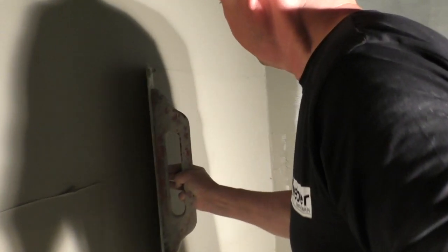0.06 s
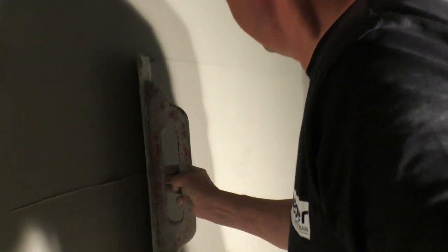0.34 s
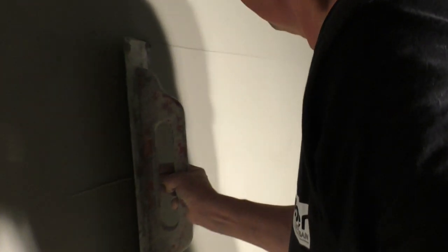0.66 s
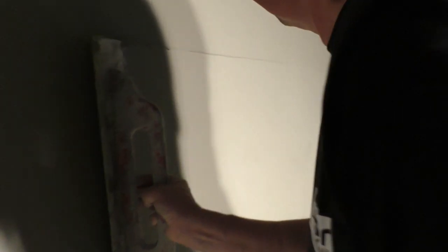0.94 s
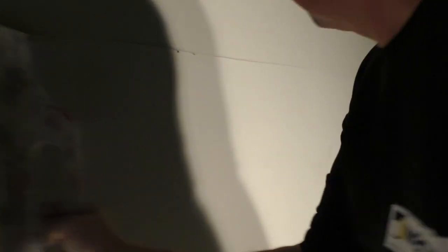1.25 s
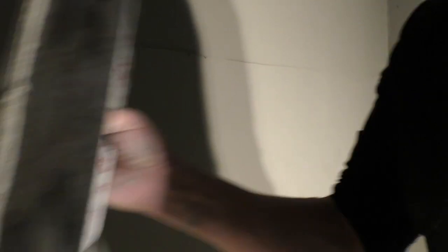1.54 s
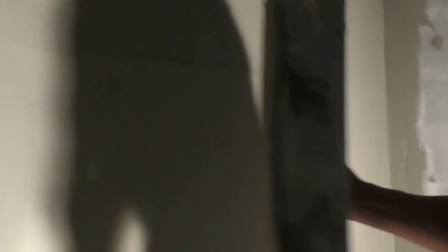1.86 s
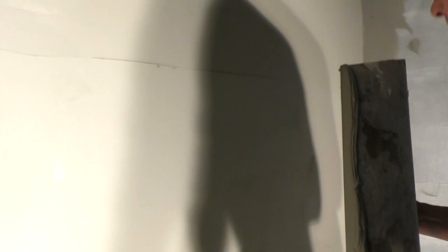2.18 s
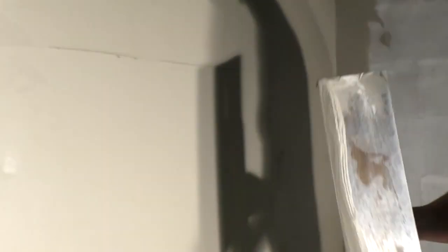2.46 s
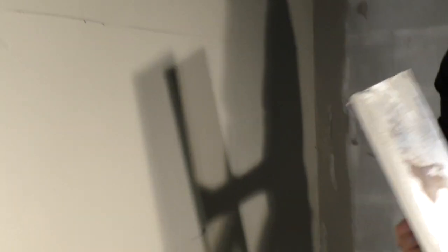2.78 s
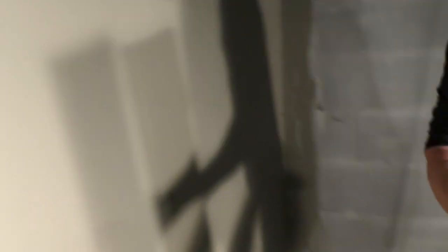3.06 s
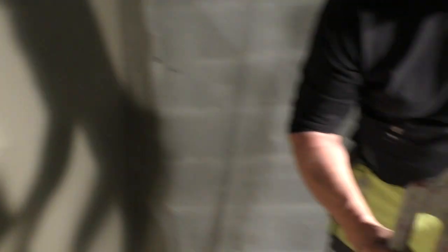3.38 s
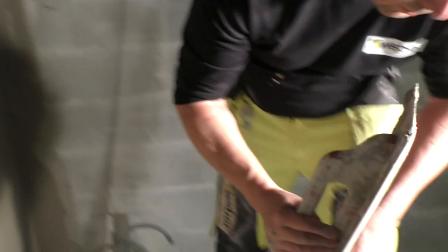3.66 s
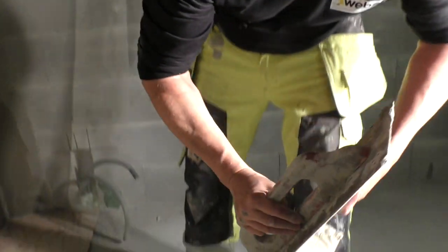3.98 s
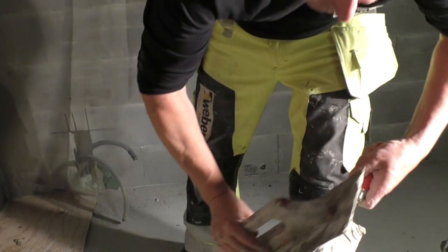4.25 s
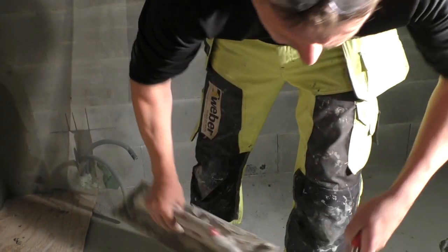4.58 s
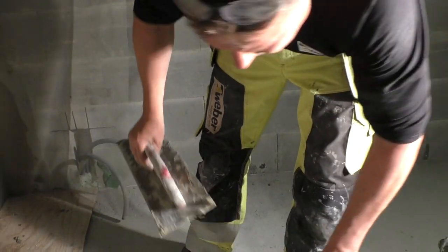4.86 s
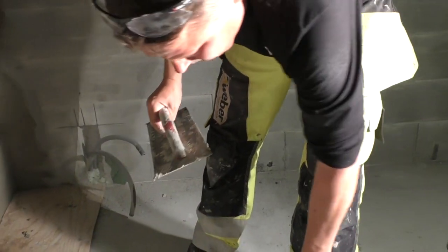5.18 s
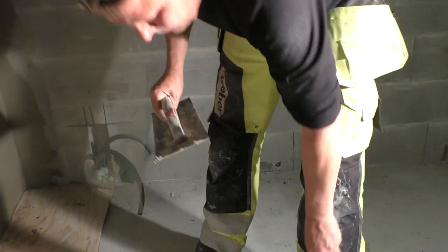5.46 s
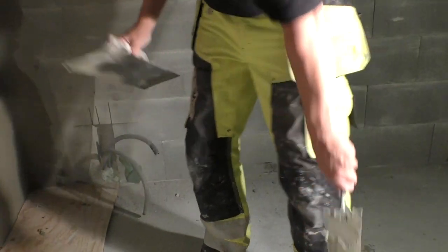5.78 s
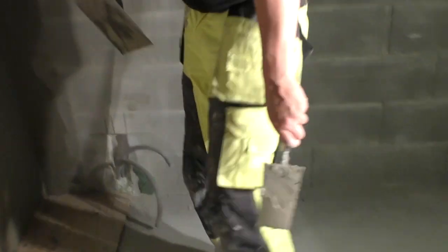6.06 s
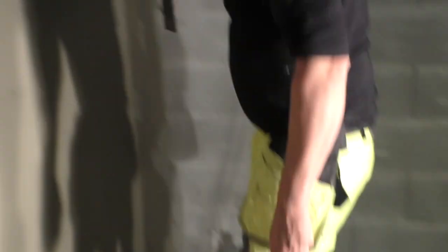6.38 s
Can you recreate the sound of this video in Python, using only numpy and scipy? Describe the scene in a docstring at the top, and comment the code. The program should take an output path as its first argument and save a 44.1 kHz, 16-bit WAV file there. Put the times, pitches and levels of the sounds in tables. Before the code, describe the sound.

In a bare, slightly echoing room, wet mortar rasps under a steel trowel, fading before a quick finishing swipe. Soft steps and rustling clothes follow. Then two trowels click and scrape together, steel on steel, and the loosened mortar lands in a tub with a wet, hollow thump. A gritty footstep comes last. A hand-held microphone picks up low rumble and a faint steady hum underneath.

```python
"""A wet, gritty rasp with a brief sinking tone: a plasterer draws a steel trowel through mortar on a wall.
He flicks it off, steps back over a gritty floor, scrapes the blade clean with a second trowel, drops
the lump into a booming tub and scuffs away. The scrapes are stick-slip friction of sand grains, coloured
by the resonances of the steel; the boom is the free vibration of the tub. A bare block-walled room
reflects it all, over a faint hum and the low rumble of a swaying hand-held microphone."""
import sys
import numpy as np
from scipy import signal
from scipy.fft import rfft, irfft, next_fast_len
from scipy.io import wavfile
from scipy.ndimage import map_coordinates

SR = 44100
rng = np.random.default_rng(int(sys.argv[2]) if len(sys.argv) > 2 else 0)


def dump(signal):
    """Clip the signal to [-1, 1] and save it as 16-bit WAV at the path in sys.argv[1]."""
    limited = np.clip(np.atleast_2d(signal).T, -1, 1)
    pcm = np.round(limited * 32767).astype(np.int16)
    wavfile.write(sys.argv[1], SR, pcm)


N = 291954
TIME = np.arange(N) / SR

# A scrape has four bands, low to high: drag, paste, rasp, hiss. A mix is (drag, paste, hiss) re rasp.
# pressure of the blade on the wall, expressed as its rasp: (time [s], level [dB])
WALL_PRESSURE = [(0, -44), (.05, -52), (.104, -53), (.113, -38.5), (.155, -35), (.25, -40), (.6, -47.5),
                 (.88, -55.5), (1.1, -54), (1.26, -39.5)]
FIRM_DB = -40   # an ordinary firm pressure
# mix on the wall, a row per band: (level at firm pressure [dB], slope with pressure [dB/dB])
PRESSURE_MIX = [(-3.5, 1.0), (-2.5, .1), (-11.5, -.38)]
# wet paste shearing under the blade: (pressure [dB], centre frequency [Hz], level [dB])
PASTE_SHEAR = [(-56, 950, -51), (-51, 1000, -42), (-45, 990, -37.5), (-39, 840, -33.5)]
# the blade sings, sinking as it flattens: (time [s], frequency [Hz], level [dB])
BLADE_SONG = [(0.15, 900, -46), (0.2, 839, -33.5), (0.27, 787, -36.5), (0.33, 730, -50), (0.46, 690, -50),
              (0.52, 670, -60)]
# resonances of the steel blade: (frequency [Hz], bandwidth [Hz], relative gain [dB])
BLADE_MODES = [(1120, 39, -2), (1500, 90, 3), (1730, 70, -16), (2015, 105, 4), (2612, 42, 9),
               (3270, 180, 8), (3430, 160, 10), (4320, 160, 5)]

# quick strokes: (start [s], attack [s], hold [s], release [s], rasp [dB], sag over the hold [dB],
# drag re rasp [dB], drag gained as mortar gathers [dB], paste re rasp [dB], hiss re rasp [dB])
FLICK_STROKE = (1.243, .028, .09, .014, -23, 5.5, -10.5, 11, 1, -10.5)
SCOOP_STROKE = (3.414, .016, .072, .036, -21.2, 0, -7, 0, -4.5, -15.5)
TUB_STROKE = (5.372, .012, .335, .025, -35.5, 4.5, 3, 0, 4.5, -17.5)
SCUFF_STROKE = (6.326, .02, .036, .025, -26, 0, -5.5, 0, -3, -13)
# the hand pushes and tilts the blade in cleaning: (time [s], half length [s], rasp [dB], hiss [dB])
HAND_PUSHES = [(3.845, .03, 3, -1), (3.89, .025, -1, -10), (3.94, .018, 3, 2), (4.115, .05, -4, -7),
               (4.29, .03, 7.5, 3.5), (4.475, .025, 4, -2)]
# modes of the tub: (frequency [Hz], relative level [dB], T60 [s])
TUB_WALL_MODES = [(267, 3.5, .17), (314, -7, 0.1), (422, -8, 0.093), (583, -21, .16), (670, -15, .18),
                  (1070, -20, .1), (1427, -9, 0.19), (1535, -3.5, 0.14), (1610, -20, 0.095)]
LANDING_S = 5.368   # the lump meets the tub

# soles shifting on the floor: (start [s], hold [s], rasp level [dB], dry grit [0-1])
SOLE_SLIDES = [(0, .04, -46, 0), (2.085, .06, -48, .1), (2.307, .07, -42.5, .45), (2.735, .045, -44, .9),
               (2.815, .15, -44, .5), (3.005, .09, -47, .05), (3.352, .02, -48, .2), (4.815, .14, -53, .35),
               (5.11, .015, -55, .6), (5.97, .012, -37.5, .97), (6.302, .03, -37.5, .15),
               (6.44, .17, -51.5, 0)]
# mix of a step, a row per band: (level for a soft sole [dB], level on dry grit [dB])
SOLE_MIX = [(2, -22), (2, -15), (-12.5, -17)]
# clothes rustling: (start [s], hold [s], rasp level [dB])
CLOTH_RUSTLES = [(2.1, .95, -57), (4.72, .38, -62), (5.8, .78, -59)]
# sand cracking and steel touching: (time [s], snap peak [dB], treble lift [dB])
GRAIN_TICKS = [(0.108, -28, 0), (0.5565, -24, -6), (0.688, -30, -2), (1.270, -17, 0), (2.090, -32, -3),
               (2.313, -34, -7), (2.91, -26.5, -9), (3.011, -28, -4), (3.091, -30, -5), (3.4203, -18, -3),
               (3.4388, -8, -12), (3.4705, -13, -6), (3.4893, -7, -9), (4.014, -17, 0), (4.436, -11, 0),
               (4.521, -15, -4), (4.828, -36, 8), (4.892, -25, 5), (5.632, -25.5, -11), (6.172, -34, -13),
               (6.3415, -12.5, -6), (6.384, -13.5, -7), (6.506, -27.5, -10)]
# dull knocks of tools and shoes: (time [s], level [dB], centre frequency [Hz], T60 [s])
DULL_KNOCKS = [(0.556, -25, 560, .025), (0.688, -33, 1000, .03), (0.764, -29, 950, 0.026),
               (1.133, -32, 1047, 0.033), (1.272, -25, 820, .1), (2.09, -31, 192, 0.14),
               (3.011, -26.5, 600, 0.077), (3.091, -30.5, 796, 0.03), (3.468, -18.5, 275, 0.099),
               (4.515, -32, 364, 0.17), (5.718, -25.5, 620, 0.08), (6.341, -24.5, 420, 0.13)]

# spectra of the scrapes, before their four bands are balanced: (frequency [Hz], relative level [dB])
WALL_SPECTRUM = [(71, -65), (120, -23), (177, -8), (250, -18.5), (307, -8.5), (471, -10.5), (511, -4),
                 (615, -11), (802, 1.5), (1540, -21), (3490, -20), (5580, -23.5), (7890, -30.5),
                 (11600, -28.5), (15800, -33)]
FLICK_SPECTRUM = [(88, -50), (150, -30), (291, -20), (340, -7), (598, -15), (741, -0.5), (974, -8),
                  (1030, -5.5), (1470, -14.5), (2000, -10), (2900, -14), (3460, -11), (7110, -22.5),
                  (12000, -17.5), (15800, -27)]
SCOOP_SPECTRUM = [(71, -28), (120, -1), (181, -26), (255, -6), (400, -14), (533, -6.5), (1090, -5.5),
                  (1360, -2), (1710, -9), (2090, -2.5), (2370, -12), (3420, -9), (4550, -9), (6180, -21),
                  (15800, -43)]
CLEANING_SPECTRUM = [(120, -76), (200, -22.5), (416, -10), (472, -15), (547, -7), (746, -5), (803, -1),
                     (1340, -1), (2040, -2), (2230, -2), (3340, 3), (4310, 1.5), (7890, -20), (15000, -18),
                     (15800, -24)]
TUB_WIPE_SPECTRUM = [(71, -39), (120, -11), (226, -15), (272, -3.5), (326, -15), (392, -13), (522, -15),
                     (739, -9.5), (852, -5), (983, -11.5), (1110, -6.5), (1930, -19), (3420, -18.5),
                     (6050, -33.5), (15800, -43)]
SCUFF_SPECTRUM = [(71, -45), (120, 2.5), (295, -5), (354, 2.5), (400, -3), (640, -5.5), (785, -13.5),
                  (1280, -10), (1420, -11), (1810, -14.5), (3420, -12), (12600, -27), (15800, -40)]
SHUFFLE_SPECTRUM = [(71, -20), (120, 4), (153, -11.5), (221, -6), (409, -11), (501, -12), (615, -12.5),
                    (739, -9.5), (1130, -15), (2730, -11.5), (3350, -5), (4360, -9.5), (15800, -36)]
# spectra of the wet slap, a tick, still air and rumble: (frequency [Hz], relative level [dB])
SLAP_SPECTRUM = [(60, -35), (120, -15), (190, -16), (290, -6), (400, 7), (600, -5), (1000, -6), (1250, -3),
                 (1550, 3.5), (1900, -17), (3600, -16), (7000, -32.5), (15800, -64)]
TICK_SPECTRUM = [(300, -23.5), (1000, -3), (2200, 2), (4000, 4), (7000, -17.5), (12000, -10.5),
                 (15800, -22)]
AIR_SPECTRUM = [(35, -13), (55, -14), (85, -15), (125, -21), (170, -20.5), (280, -18.5), (450, -18.5),
                (750, -18.5), (1240, -20.5), (2400, -29.5), (3500, -25.5), (5000, -33.5), (7500, -46),
                (15800, -49.5)]
RUMBLE_SPECTRUM = [(10, -11.5), (25, -3), (55, 0.5), (80, -17.5), (120, -20), (250, -39), (700, -86.5)]

# reverberation time of the room: (frequency [Hz], T60 [s])
REVERB_TIMES = [(150, .6), (500, 0.42), (1400, 0.5), (3700, 0.32), (10000, 0.27), (16000, 0.27)]
# swells added to the resting hum: (start [s], hold [s], level [dB])
HUM_SWELLS = [(1.38, .65, -57), (2.75, .45, -56)]
# slow pressure swings on the microphone: (time [s], relative level [dB])
SWAY_ENVELOPE = [(0.0, -38), (0.26, -19), (0.41, -30), (1.9, -36), (1.99, -29), (3.95, -18), (4.02, -24),
                 (4.77, -27), (5.03, -16), (5.12, -29), (5.9, -33), (6.01, -22), (6.25, -30), (6.4, -11),
                 (6.53, -14), (6.62, -30)]
# low thuds of footfalls and handling: (time [s], level [dB])
LOW_THUDS = [(0, -29), (.2, -41), (2.09, -40), (3.03, -40), (3.13, -39), (3.47, -39), (5.48, -39),
             (5.72, -35), (6.35, -36)]


def scrape(motion, spectrum, grains_per_s, grain_db, judder_db, steel, paste_from_hz=600):
    """Stick-slip friction: grains catch and slip as random impulses, which excite any steel's modes."""
    t, gate, (rasp_db, drag_db, paste_db, hiss_db) = motion
    sizes = from_db(grain_db * np.minimum(rng.exponential(1, len(t)), 4))
    signs = rng.choice([-1, 1], len(t))
    slips = rng.random(len(t)) < grains_per_s / SR
    clumping = from_db(judder_db * drift(t, 240))
    friction = coloured(sizes * signs * slips * clumping, spectrum)
    ringing = sum(from_db(db) * resonance(friction, hz, width) for hz, width, db in BLADE_MODES)
    contact = friction + steel * ringing
    bands = [(140, 600, drag_db), (paste_from_hz, 2200, paste_db),
             (2200, 6000, 0), (6000, 17000, hiss_db)]
    sound = sum(from_db(db) * unit_rms(band(contact, low, high)) for low, high, db in bands)
    return placed(gate * from_db(rasp_db) * sound, t[0])


def shear(motion, width_hz, judder_db):
    """Stick-slip of paste on the blade: random modulation spreads a moving tone into a noise band."""
    t, gate, (centre_hz, level_db) = motion
    phase = 2 * np.pi * np.cumsum(centre_hz) / SR
    noise_band = drift(t, width_hz) * np.cos(phase) + drift(t, width_hz) * np.sin(phase)
    judder = from_db(judder_db * drift(t, 90.2))
    return placed(gate * from_db(level_db) * unit_rms(noise_band * judder), t[0])


def wall_draw():
    """Friction follows normal force: more pressure drags more mortar, less leaves the edge hissing."""
    t, gate, (pressure_db,) = follow(WALL_PRESSURE)
    mix_db = [db + slope * (pressure_db - FIRM_DB) for db, slope in PRESSURE_MIX]
    return t, gate, [pressure_db, *mix_db]


def paste_smear():
    """Shear under load: the pressure of the blade sets the centre frequency and level of the paste."""
    t, gate, (pressure_db,) = follow(WALL_PRESSURE)
    pressures, *columns = np.transpose(PASTE_SHEAR)
    return t, gate, [np.interp(pressure_db, pressures, column) for column in columns]


def quick_stroke(row):
    """Transient friction: a stroke bites, then may lose force or gather drag as it slides."""
    start_s, attack_s, hold_s, release_s, rasp_db, sag_db, drag_db, gather_db, paste_db, hiss_db = row
    t, gate = swell(start_s, attack_s, hold_s, release_s)
    progress = np.clip((t - start_s - attack_s) / hold_s, 0, 1)
    return t, gate, [rasp_db - sag_db * progress, drag_db + gather_db * progress, paste_db, hiss_db]


def cleaning_pass(rasp_db=-25, bare_s=3.88, pile_s=4.42, pile_over_s=.09):
    """Mortar damps steel-on-steel friction: dull while loaded, bright when bare, dull as it piles up."""
    t, gate = swell(start_s=3.642, attack_s=.195, hold_s=.69, release_s=.028)
    push_db, tilt_db = sum(np.outer(gains_db, np.exp(-((t - s) / half_s) ** 2))
                           for s, half_s, *gains_db in HAND_PUSHES)
    load = np.clip((bare_s - t) / (bare_s - t[0]), 0, 1)
    pile = np.clip((t - pile_s) / pile_over_s, 0, 1)
    bare_mix_db = np.array([-21.5, -7.5, -3.5])[:, None]
    push_mix_db = np.array([.3 * push_db, 1.05 * push_db, tilt_db]) - push_db   # drag follows weakly
    mortar_mix_db = np.outer((11, 6, -10), load) + np.outer((10, 4.5, -4.5), pile)
    return t, gate, [rasp_db + push_db, *(bare_mix_db + push_mix_db + mortar_mix_db)]


def tub_boom(modes_db=-16.5, smack_db=-7):
    """Free vibration: the lump smacks the bottom, and the modes of the tub decay exponentially."""
    t = TIME[:SR]
    modes = sum(from_db(db - 60 * t / t60) * np.sin(2 * np.pi * hz * t)
                for hz, db, t60 in TUB_WALL_MODES)
    smack = snap(SLAP_SPECTRUM, len(t))
    return -placed(from_db(modes_db) * modes + from_db(smack_db) * smack, LANDING_S + .001)


def sole_slide(start_s, hold_s, rasp_db, grit):
    """Sliding friction of a sole: the more dry grit under it, the weaker the low bands."""
    t, gate = swell(start_s, attack_s=.007, hold_s=hold_s, release_s=.022)
    mix_db = [soft_db + (dry_db - soft_db) * grit for soft_db, dry_db in SOLE_MIX]
    return t, gate, [rasp_db, *mix_db]


def cloth_rustle(start_s, hold_s, rasp_db, flutter_db=2.1, mix_db=(1.5, -.5, -12)):
    """Light friction of cloth: a soft rubbing whose level wanders at random."""
    t, gate = swell(start_s, attack_s=.06, hold_s=hold_s, release_s=.06)
    return t, gate, [rasp_db + flutter_db * drift(t, 18), *mix_db]


def ticks(crumble_db=-6):
    """Brittle fracture and hard contact: a broadband snap, then a short crumble; steel is brighter."""
    out = np.zeros(N)
    for s, peak_db, lift_db in GRAIN_TICKS:
        spectrum = [(hz, db + lift_db * (hz > 5000)) for hz, db in TICK_SPECTRUM]
        crumble = from_db(crumble_db) * burst(spectrum, t60=.028)
        out += placed(from_db(peak_db) * (snap(spectrum, len(crumble)) + crumble), s)
    return out


def knocks(grit_db=-17):
    """Heavily damped impacts: each gives one broad spectral hump, with some grit above it."""
    out = np.zeros(N)
    for s, level_db, hz, t60 in DULL_KNOCKS:
        hump = [(hz / 4, -22), (hz / 1.42, -4), (hz, 0)]
        grit = [(hz * 2.14, grit_db), (4500, grit_db - 10), (15000, grit_db - 35)]
        out += placed(from_db(level_db) * burst(hump + grit, t60), s)
    return out


def room_echoes(x, early_db=1, early_t60=.048):
    """Reverberation: sparse early reflections, then a diffuse tail that dies sooner in the treble."""
    t = TIME[:SR * 3 // 4]
    edges_hz = np.geomspace(60, 19000, 10)
    tail = np.zeros(len(t))
    for low, high in zip(edges_hz, edges_hz[1:]):
        t60 = at_hz(REVERB_TIMES, np.sqrt(low * high))
        tail += band(rng.standard_normal(len(t)), low, high) * from_db(-60 * t / t60)
    build_up = np.clip(t / .015, 0, 1)
    reflections = rng.standard_normal(len(t)) * (rng.random(len(t)) < .04)
    early = reflections * from_db(-60 * t / early_t60) * (t > .001)
    response = unit_rms(tail * build_up) + from_db(early_db) * unit_rms(early)
    return signal.fftconvolve(x, response / np.linalg.norm(response))[:N]


def moving_in_room(x, wet_db, places=7, places_per_s=45):
    """Reflections depend on position: a moving source cross-fades round a ring of echo patterns."""
    place = TIME * places_per_s
    echoes = np.zeros(N)
    for k in range(places):
        distance = np.abs((place - k + places / 2) % places - places / 2)
        echoes += room_echoes(x * np.cos(np.pi / 2 * np.minimum(distance, 1)))
    return (x + from_db(wet_db) * echoes) / np.sqrt(1 + from_db(wet_db) ** 2)


def room_air(level_db=-52.5):
    """Stationary noise: the floor of the still room, strongest in the bass."""
    air = coloured(rng.standard_normal(N), AIR_SPECTRUM)
    return from_db(level_db) * air / np.std(band(air, 67, 15800))


def hum(hz=124, rest_db=-64, fade_s=.15):
    """Amplitude and phase modulation: a faint low tone wavers and swells twice."""
    amplitude = from_db(rest_db)
    for start_s, hold_s, db in HUM_SWELLS:
        _, gate = swell(start_s, fade_s, hold_s, fade_s)
        amplitude = amplitude + from_db(db) * placed(gate, start_s)
    return amplitude * np.sin(2 * np.pi * hz * TIME + drift(TIME, 8.1))


def microphone_sway(hz=12, wander_hz=2.5, gain_db=1.5):
    """Infrasound: the swaying microphone meets slow swings of pressure."""
    envelope = from_db(gain_db + np.interp(TIME, *np.transpose(SWAY_ENVELOPE)))
    phase = 2 * np.pi * np.cumsum(hz + wander_hz * drift(TIME, 7)) / SR
    return envelope * (np.sqrt(2) * np.sin(phase) + .05 * drift(TIME, 68))


def handling_rumble(rest_db=-55, attack_s=.015, t60=.6):
    """Structure-borne noise: footfalls and handling raise a low rumble into decaying thuds."""
    t = TIME[:SR]
    thud = np.minimum(t / attack_s, 1) * from_db(-60 * t / t60)
    envelope = from_db(rest_db) + sum(from_db(db) * placed(thud, s) for s, db in LOW_THUDS)
    return envelope * unit_rms(coloured(rng.standard_normal(N), RUMBLE_SPECTRUM))


def snap(spectrum, size):
    """Impulse response: an instantaneous contact with the given spectrum and a peak of 1."""
    response = coloured(signal.unit_impulse(size), spectrum)
    return response / np.abs(response).max()


def burst(spectrum, t60, size=16384):
    """Exponential decay: the coloured noise of a contact dies away from a level of about 1."""
    decay = from_db(-60 * TIME[:size] / t60)
    sound = coloured(rng.standard_normal(size) * decay, spectrum)
    return sound * np.sqrt(np.sum(decay ** 2) / np.sum(sound ** 2))


def follow(rows, fade_s=.005):
    """Linear interpolation of a table into a motion: its times, a soft-ended gate and its controls."""
    times, *columns = np.transpose(rows)
    t = TIME[(TIME > times[0] - fade_s) & (TIME < times[-1] + fade_s)]
    gate = np.clip(np.minimum(t - t[0], t[-1] - t) / fade_s, 0, 1)
    return t, gate, [np.interp(t, times, column) for column in columns]


def swell(start_s, attack_s, hold_s, release_s):
    """Trapezoidal envelope: the times of a movement and its gate."""
    end_s = start_s + attack_s + hold_s + release_s
    t = TIME[(TIME > start_s) & (TIME < end_s)]
    return t, np.clip(np.minimum((t - start_s) / attack_s, (end_s - t) / release_s), 0, 1)


def drift(t, per_s):
    """Low-pass noise: a smooth curve of unit RMS through `per_s` random values a second."""
    values = rng.standard_normal(len(t) // 8)
    return unit_rms(map_coordinates(values, [(t - t[0]) * per_s], order=3, mode="wrap"))


def coloured(x, spectrum):
    """Minimum-phase filtering: folding the cepstrum gives a causal response with this spectrum."""
    size = next_fast_len(2 * len(x), True) * 2
    magnitude = from_db(at_hz(spectrum, np.fft.rfftfreq(size, 1 / SR)))
    cepstrum = irfft(np.log(magnitude))
    cepstrum[1:size // 2] *= 2
    cepstrum[size // 2 + 1:] = 0
    return irfft(rfft(x, size) * np.exp(rfft(cepstrum)))[:len(x)]


def resonance(x, hz, width_hz):
    """Forced vibration of one damped mode: a two-pole resonator."""
    radius = np.exp(-np.pi * width_hz / SR)
    feedback = [1, -2 * radius * np.cos(2 * np.pi * hz / SR), radius ** 2]
    return signal.lfilter(np.array([1, 0, -1]) * (1 - radius ** 2) / 2, feedback, x)


def band(x, low_hz, high_hz):
    """Band-pass filtering with a flat passband."""
    return signal.sosfilt(signal.butter(3, [low_hz, high_hz], "band", fs=SR, output="sos"), x)


def at_hz(points, hz):
    """Interpolation on a logarithmic frequency axis."""
    frequencies, values = np.transpose(points)
    return np.interp(np.log(np.maximum(hz, 1)), np.log(frequencies), values)


def placed(x, start_s):
    """Pure delay: a short sound set at its moment in the scene."""
    return np.concatenate([np.zeros(max(round(start_s * SR), 0)), x, np.zeros(N)])[:N]


def unit_rms(x):
    """Normalisation to a mean power of 1."""
    return x / np.sqrt(np.mean(x ** 2) + 1e-20)


def from_db(db):
    """The decibel law: level to amplitude ratio."""
    return 10 ** (np.asarray(db) / 20)


def scene():
    """Superposition: trowels, tub and feet sound in one room, over the background."""
    wall = scrape(wall_draw(), WALL_SPECTRUM,
                  grains_per_s=12000, grain_db=2.5, judder_db=.8, steel=.3, paste_from_hz=1340)
    wall += shear(paste_smear(), width_hz=540, judder_db=1.8)
    wall += shear(follow(BLADE_SONG), width_hz=35, judder_db=1.5)
    wall += scrape(quick_stroke(FLICK_STROKE), FLICK_SPECTRUM,
                   grains_per_s=7000, grain_db=2, judder_db=1.5, steel=.22)
    tools = scrape(quick_stroke(SCOOP_STROKE), SCOOP_SPECTRUM,
                   grains_per_s=4000, grain_db=4, judder_db=1, steel=.25)
    tools += scrape(cleaning_pass(), CLEANING_SPECTRUM,
                    grains_per_s=7000, grain_db=3, judder_db=2, steel=.2)
    tools += scrape(quick_stroke(TUB_STROKE), TUB_WIPE_SPECTRUM,
                    grains_per_s=8000, grain_db=3, judder_db=1.5, steel=.24)
    slap = from_db(-15) * placed(burst(SLAP_SPECTRUM, t60=.13), LANDING_S)
    scuff = scrape(quick_stroke(SCUFF_STROKE), SCUFF_SPECTRUM,
                   grains_per_s=4000, grain_db=5, judder_db=.5, steel=0)
    motions = [sole_slide(*row) for row in SOLE_SLIDES] + [cloth_rustle(*row) for row in CLOTH_RUSTLES]
    shuffles = sum(scrape(motion, SHUFFLE_SPECTRUM,
                          grains_per_s=5000, grain_db=3, judder_db=1.5, steel=0) for motion in motions)
    boom = tub_boom()
    work = moving_in_room(wall + tools + slap + scuff + shuffles + ticks() + knocks(), wet_db=-3)
    tub = boom + from_db(-8.5) * room_echoes(boom)
    background = room_air() + hum() + microphone_sway() + handling_rumble()
    return (work + tub + background)[None]


def record(dry):
    """Band limiting: a steep elliptic low-pass removes the highest treble."""
    cutoff_hz = 15900
    return signal.sosfilt(signal.ellip(12, .1, 80, cutoff_hz, fs=SR, output="sos"), dry)


dry = scene()
out = record(dry)
dump(out)
```